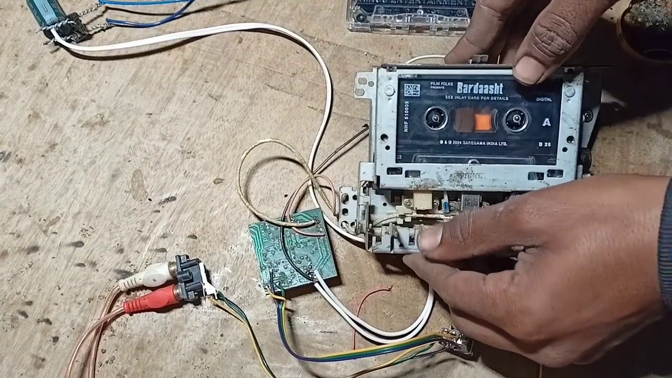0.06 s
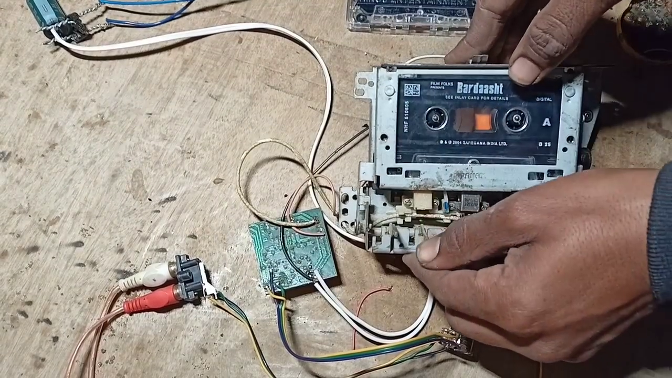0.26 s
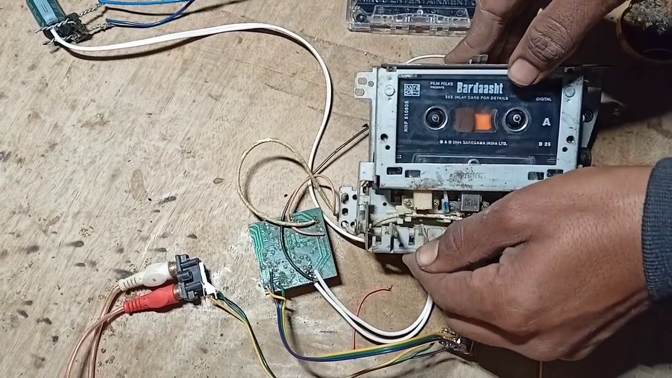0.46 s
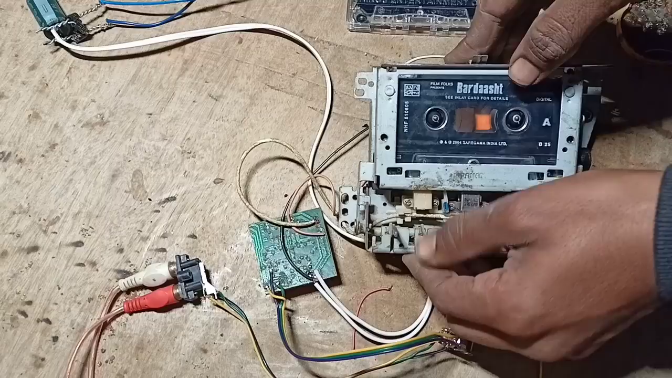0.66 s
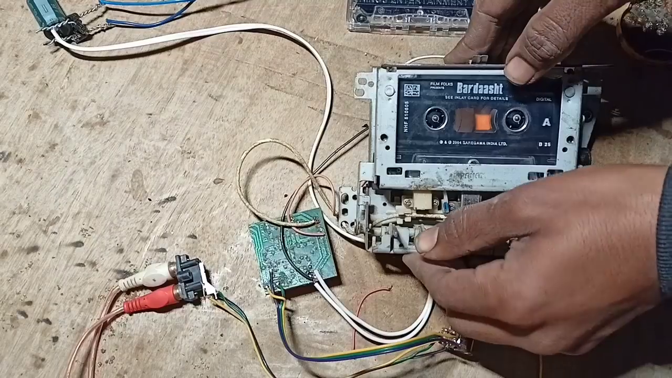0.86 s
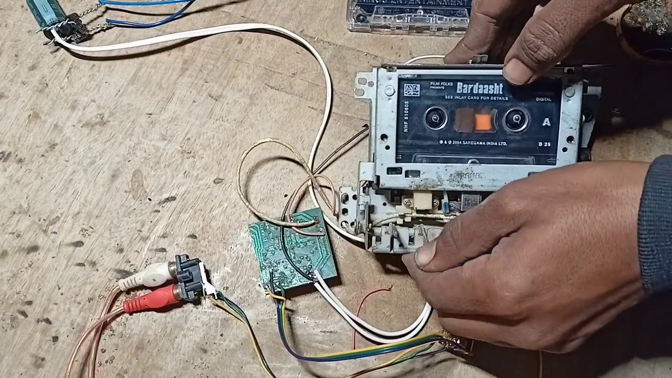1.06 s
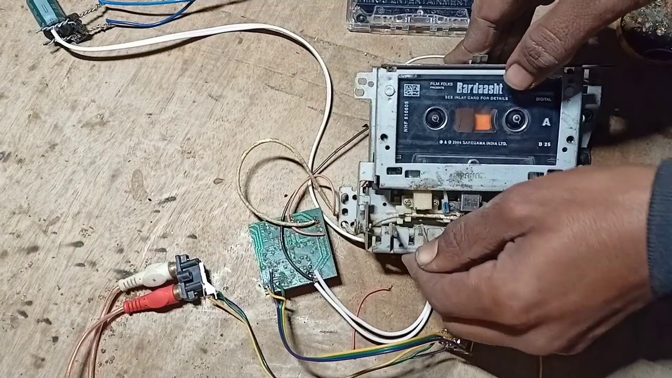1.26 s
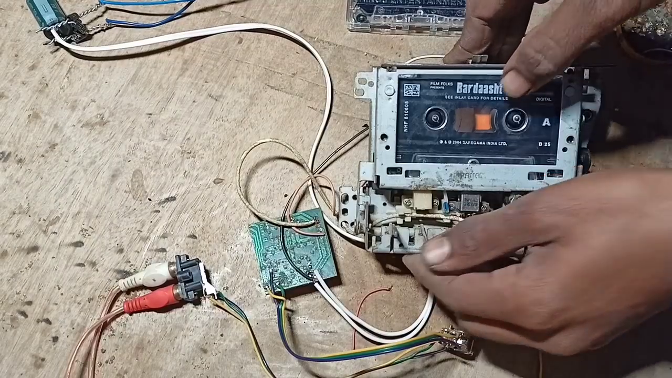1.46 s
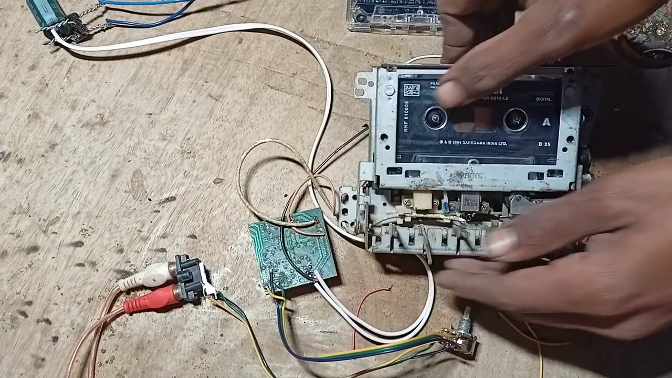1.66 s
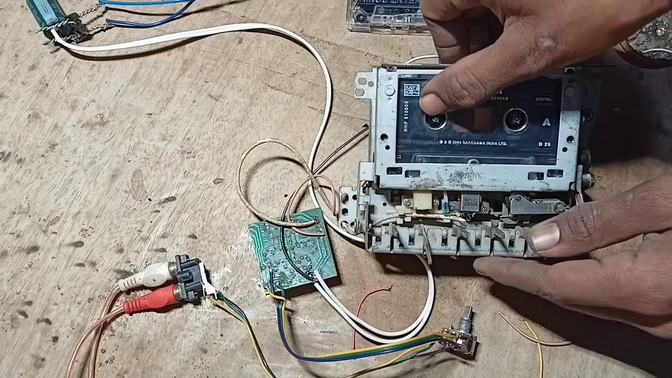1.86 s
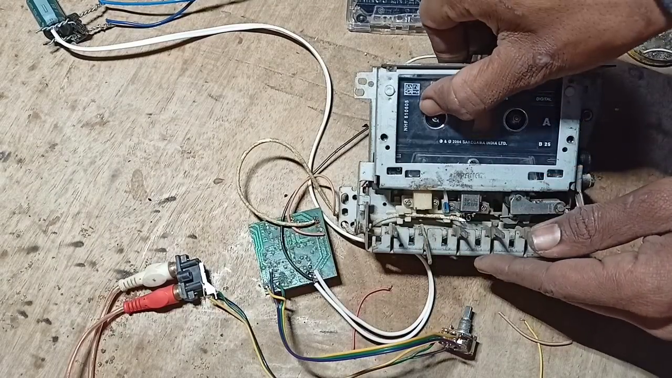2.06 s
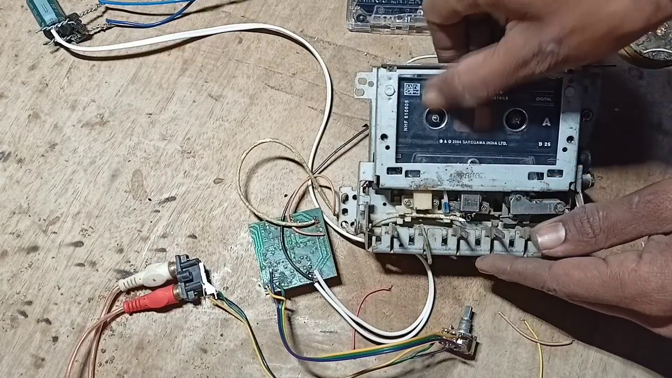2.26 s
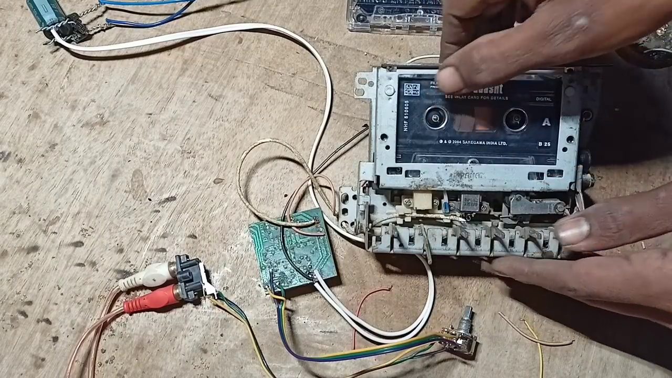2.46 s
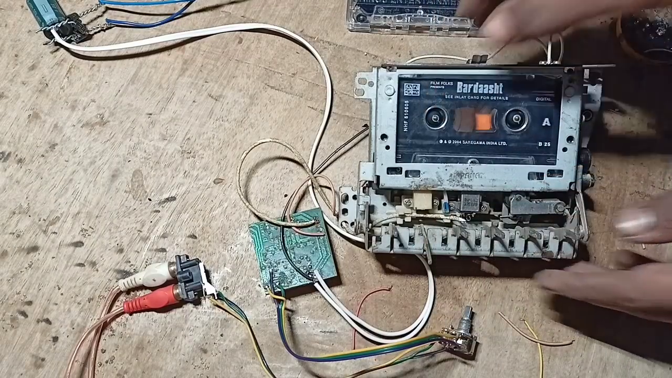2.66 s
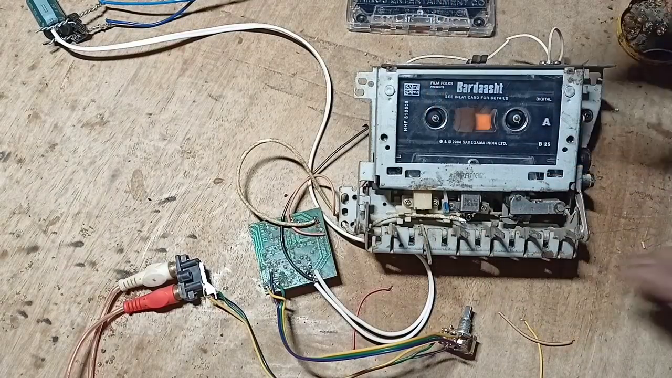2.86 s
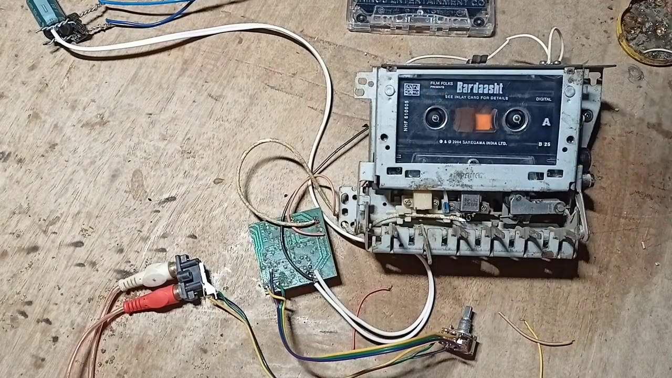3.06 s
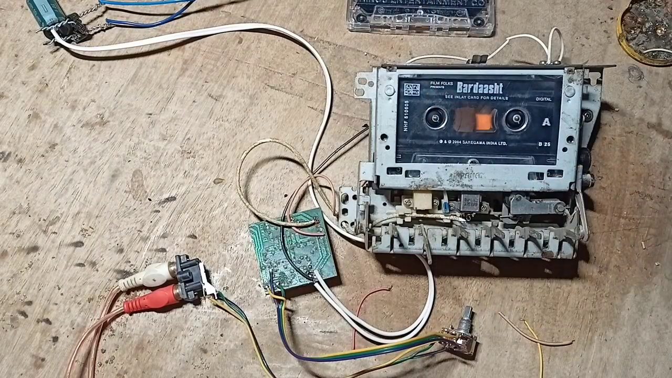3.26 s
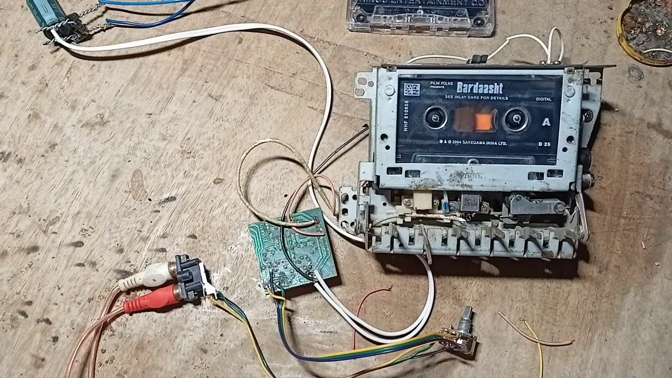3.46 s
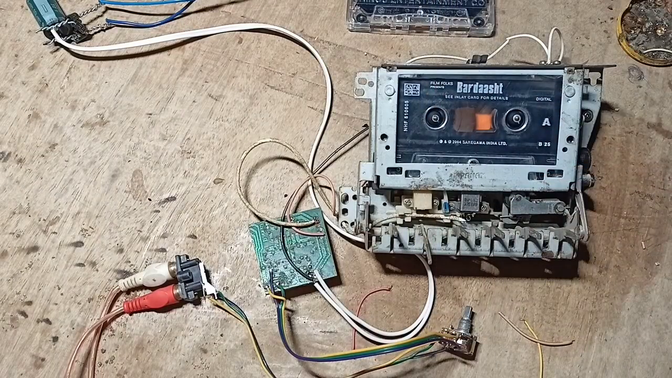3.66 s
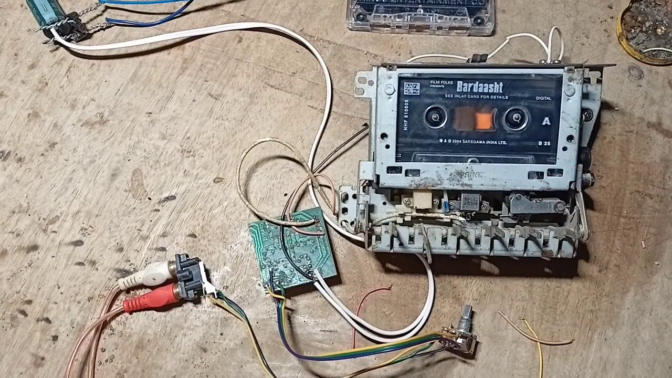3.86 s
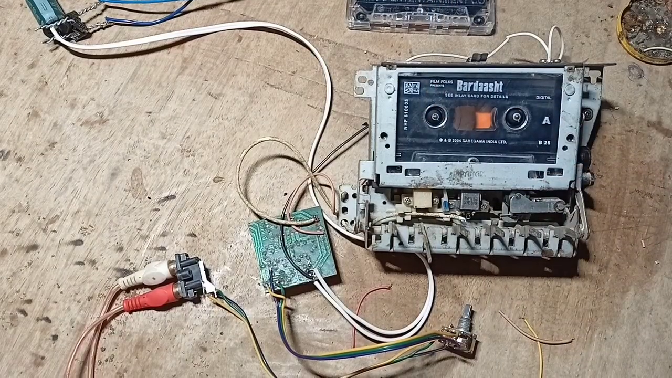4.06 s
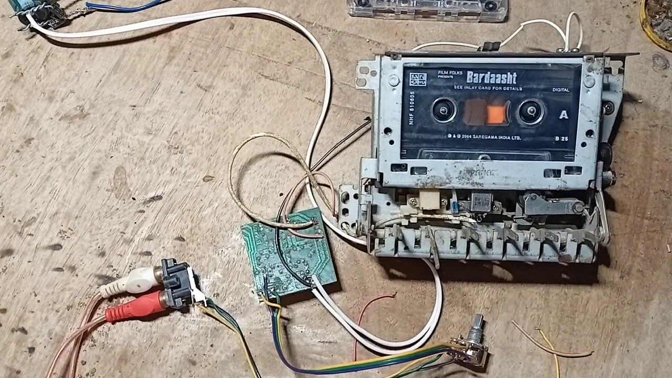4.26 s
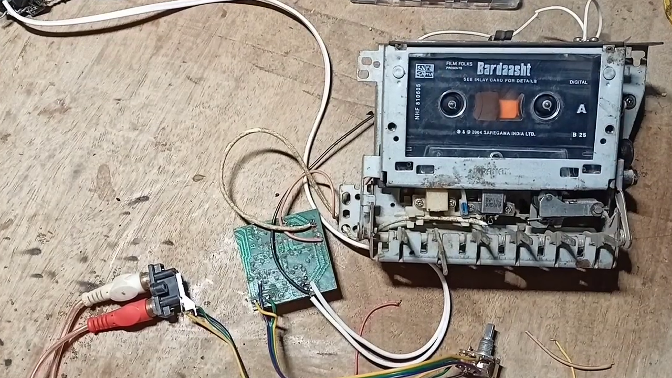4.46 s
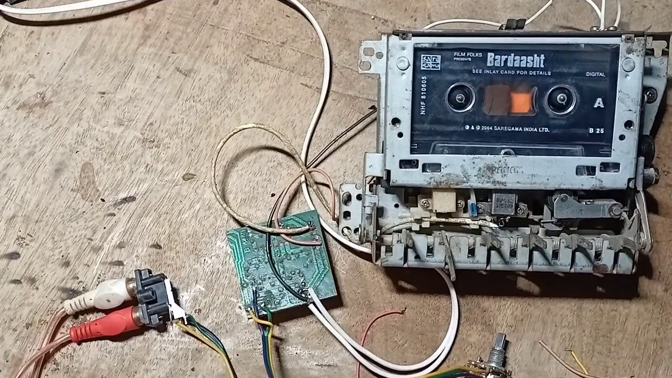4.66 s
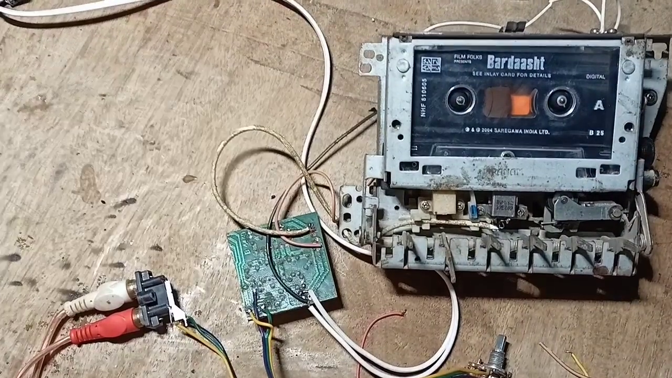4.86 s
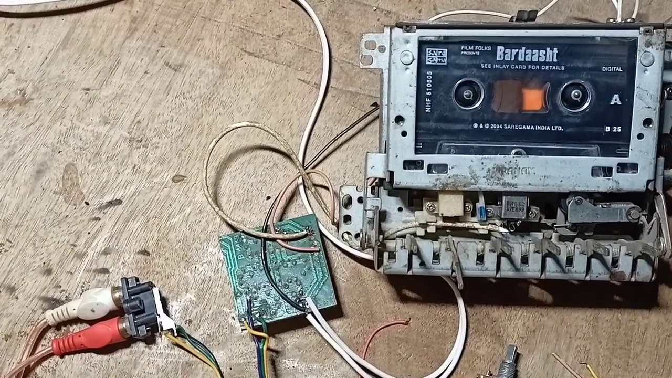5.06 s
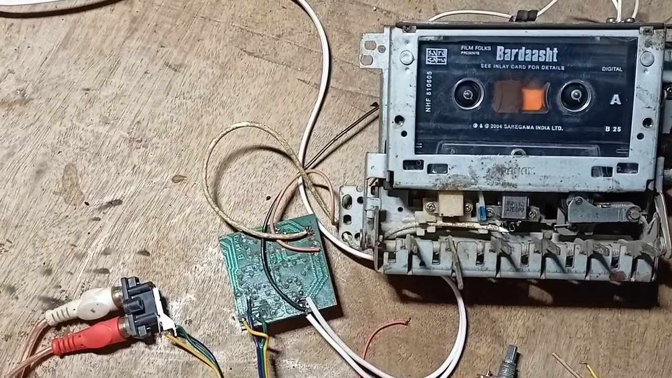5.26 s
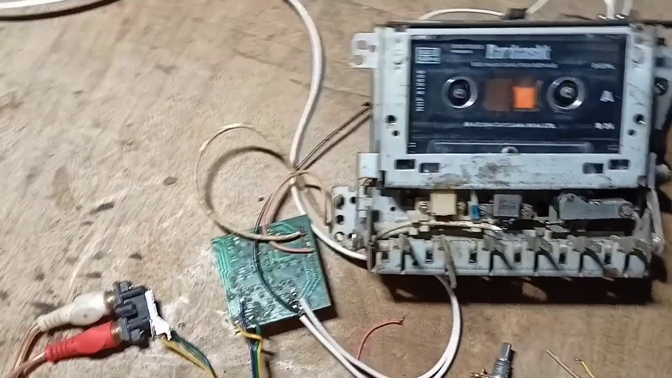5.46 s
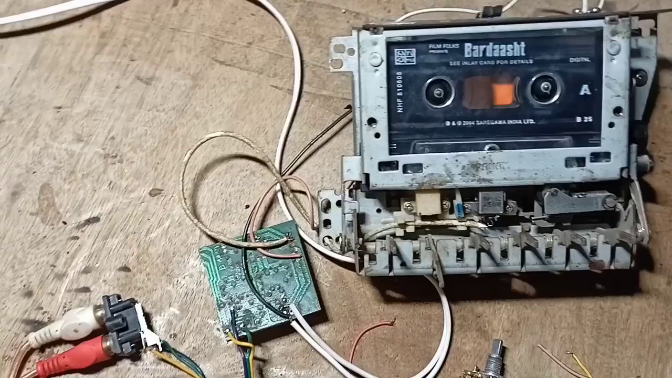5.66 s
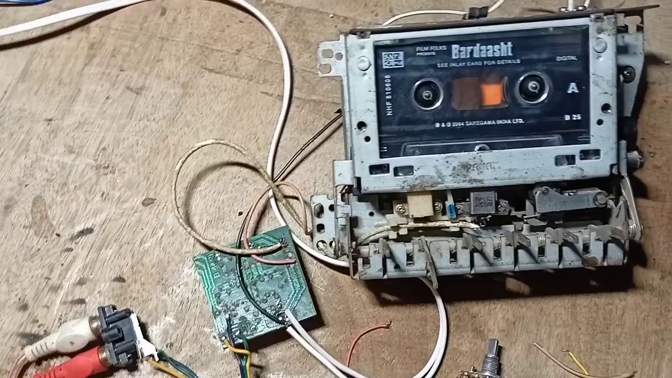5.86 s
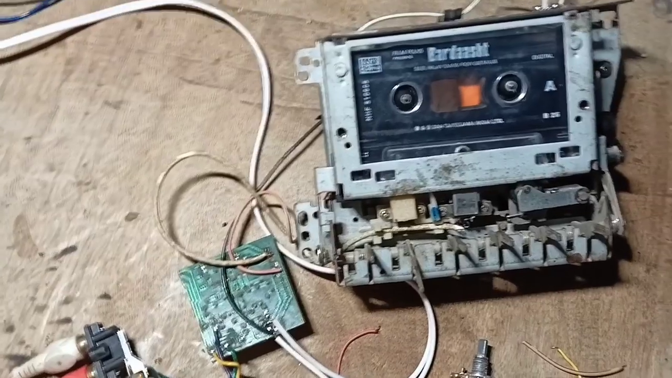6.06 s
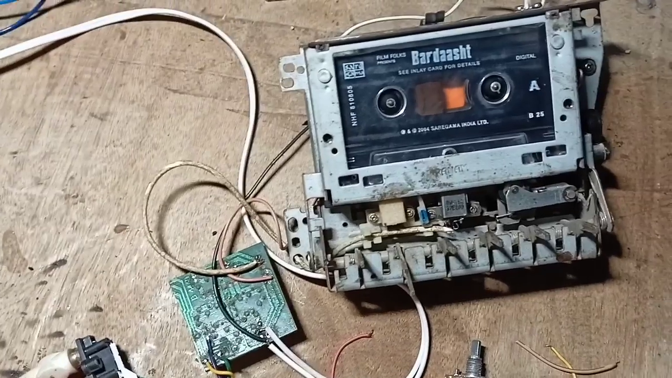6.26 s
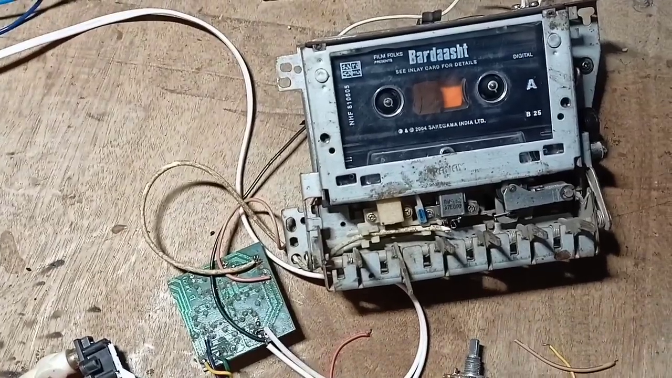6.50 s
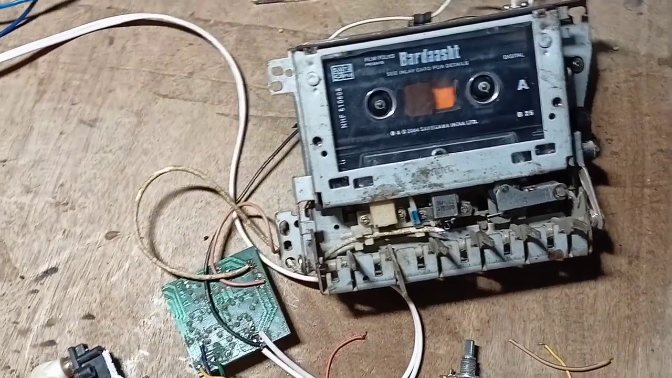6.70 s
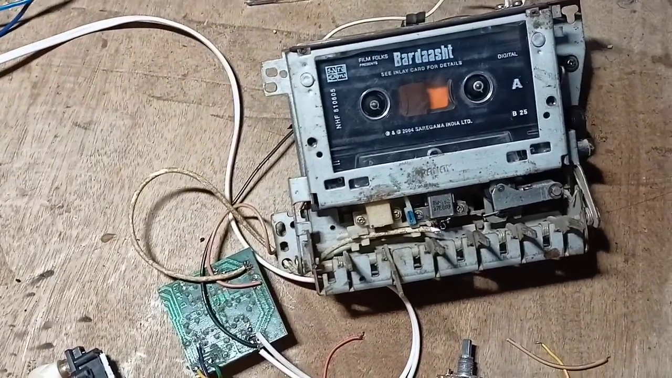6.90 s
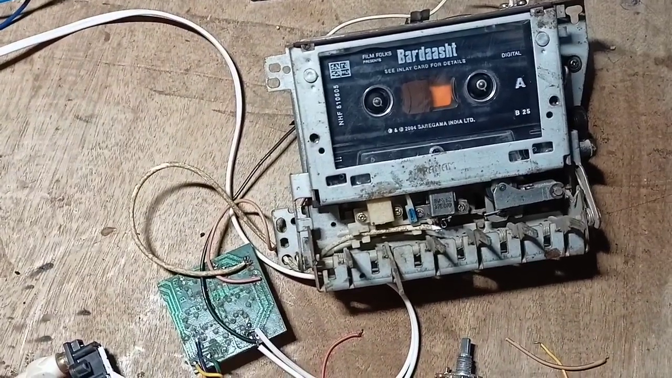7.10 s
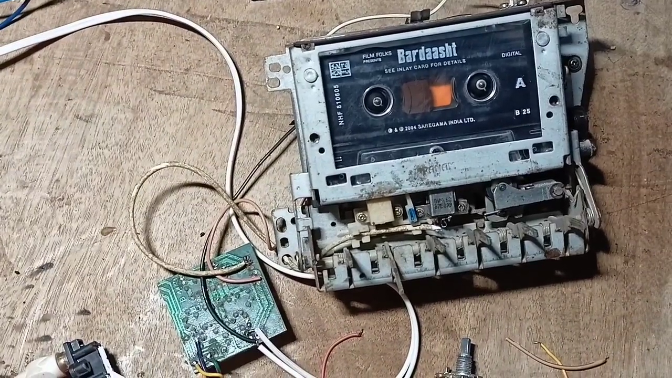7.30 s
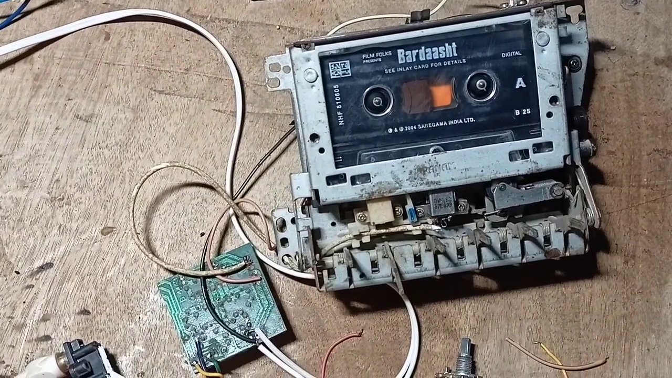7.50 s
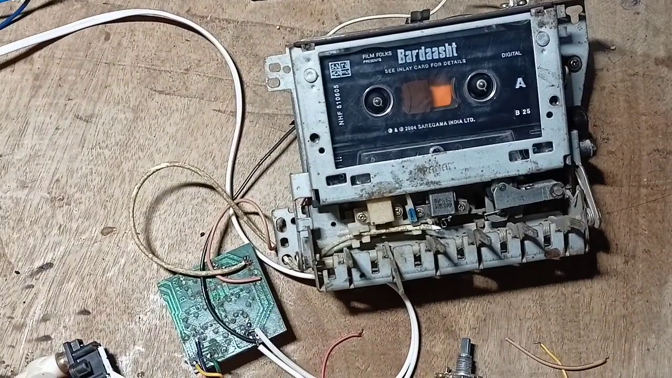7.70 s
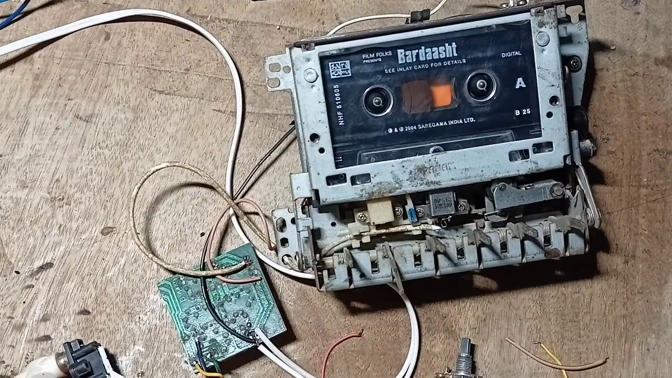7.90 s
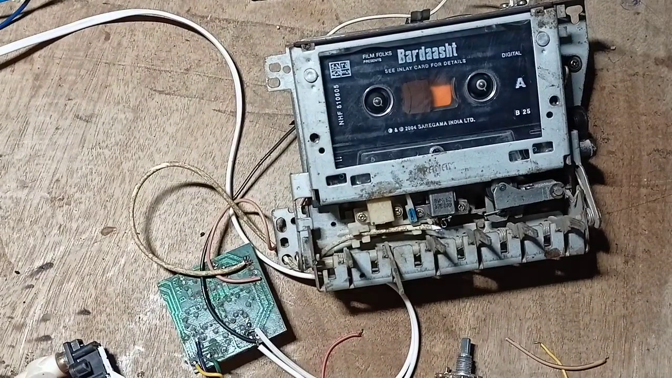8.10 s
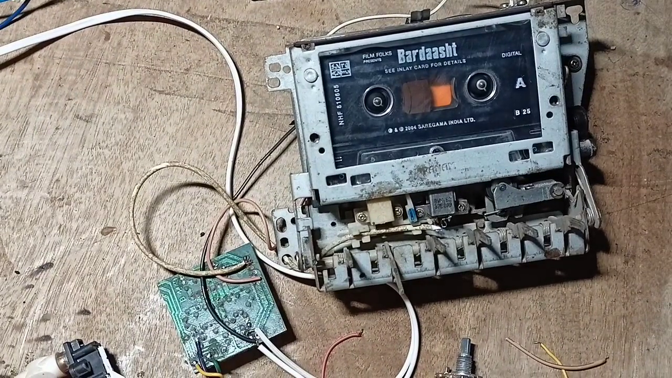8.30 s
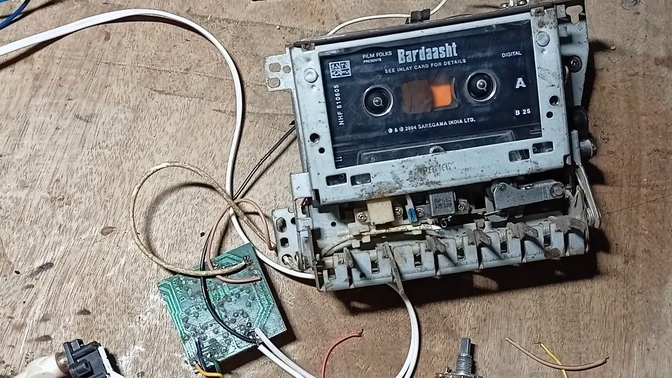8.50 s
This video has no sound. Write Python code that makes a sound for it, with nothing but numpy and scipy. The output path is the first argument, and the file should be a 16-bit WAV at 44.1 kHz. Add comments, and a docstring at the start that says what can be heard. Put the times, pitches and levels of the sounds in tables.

```python
"""Cassette mechanism winding on a bench

A bare cassette mechanism on a wooden bench is started, stopped and started again, then winds tape.
Rubbing and knocking gears and spool hubs drive noise through the resonances of the steel chassis.
The key's thumps are decaying bench modes; the motor is a throbbing tone in a band of noise.
Mains hum and the thin whine of a switching supply, both built from sines, run throughout."""
import sys
import numpy as np
from scipy import signal
from scipy.fft import rfft, irfft
from scipy.io import wavfile
from scipy.ndimage import uniform_filter1d

SR = 44100
rng = np.random.default_rng(int(sys.argv[2]) if len(sys.argv) > 2 else 0)


def dump_mix(stems):
    """Bounce the given channels to the path in sys.argv[1] as a 16-bit WAV at rate SR."""
    frames = np.atleast_2d(stems).T  # one column per channel
    limited = np.clip(frames, -1, 1)  # hard clip at full scale
    pcm = np.round(limited * 32767).astype(np.int16)
    wavfile.write(sys.argv[1], SR, pcm)


N = 376613
T = np.arange(N) / SR  # s

MAINS_HZ = 49.85
RUN_UP_S, RUN_DOWN_S = 0.013, 0.061  # motor run-up; the wheels coast to rest
# the winding key is down: start t/s, end t/s
RUNS = [(0.42, 0.915), (1.133, 9)]


def gain_of(db):
    """Decibels to a factor."""
    return 10 ** (np.asarray(db) / 20)


def evened(x):
    """Scales to rms 1."""
    return x / np.sqrt(np.mean(x ** 2) + 1e-20)


def curve(rows, order=1):
    """One column of a table, joined by straight lines, at every sample."""
    rows = np.array(rows)
    return np.interp(T, rows[:, 0], rows[:, order])


def between(start_s, end_s, ramp_s):
    """One from start to end with straight ramps inside, zero elsewhere."""
    return np.clip(np.minimum(T - start_s, end_s - T) / ramp_s, 0, 1)


def read(points, hz):
    """A spectrum in dB on a log-frequency axis."""
    f, value = np.transpose(points)
    return np.interp(np.log(hz + 1), np.log(f + 1), value)


def causal(db):
    """Minimum-phase impulse response of unit energy for a half spectrum in dB."""
    both_halves = np.r_[db, db[-2:0:-1]]
    log_gain = np.log(gain_of(np.maximum(both_halves, -100)))
    phase = -signal.hilbert(log_gain).imag
    taps = np.fft.ifft(np.exp(log_gain + 1j * phase)).real[:len(db)]
    return taps / np.linalg.norm(taps)


def hiss(points):
    """Steady noise of rms 1 with a given spectrum."""
    gain = gain_of(read(points, np.fft.rfftfreq(N, 1 / SR)))
    return evened(irfft(rfft(rng.standard_normal(N)) * gain, N))


def wander(top_hz):
    """Slow chance of rms 1: twelve sines of random phase over the decade below top_hz."""
    hz = np.geomspace(top_hz / 10, top_hz, 12)[:, None]
    coarse = T[::256]
    sines = np.sin(2 * np.pi * (hz * coarse + rng.random((12, 1))))
    return np.interp(T, coarse, evened(sines.sum(0)))


def resonate(x, hz, width_hz):
    """A single resonance of gain 1 at its peak."""
    return signal.lfilter(*signal.iirpeak(hz, hz / width_hz, fs=SR), x)


def engaged(ramp_s):
    """One while the winding key is down, zero while it is up, with a run-up and a coast to rest."""
    return sum(np.clip(np.minimum((T - a) / ramp_s, (b - T) / RUN_DOWN_S + .5), 0, 1) for a, b in RUNS)


def hum():
    """Transformer hum: steady partials of the mains, the odd ones a quarter turn from the even ones."""
    # hum partials: multiple of mains, relative rms level/dB
    partials = [(1, -51), (2, -56), (3, -47), (4, -49), (5, -62), (7, -70), (8, -70)]
    waves = sum(gain_of(db) * np.sqrt(2) * np.cos(2 * np.pi * (k * MAINS_HZ * T + k % 2 / 4))
                for k, db in partials)
    return gain_of(0.3) * waves


def whine():
    """Switching tones split by the mains ripple, each fading on its own, in a fuzz that throbs with the ripple."""
    # supply tones: carrier f/Hz, sideband number in steps of twice the mains, relative level/dB
    tones = [(15103, -3, -64), (15103, -2, -63), (15103, -1, -60), (15103, 0, -51), (15103, 1, -53),
             (15103, 2, -58), (15103, 3, -66), (15028, -3, -64), (15028, -2, -57), (15028, -1, -61),
             (15028, 0, -58), (15028, 1, -57), (15028, 3, -66), (15478, 0, -62)]
    # the whine wavers at the microphone: t/s, level/dB
    wavering = [(0, -48), (.5, -42), (.88, -48), (1.12, -42), (1.9, -43), (2.31, -51), (2.88, -37.5),
                (3.54, -41), (4.14, -46), (4.92, -39), (5.2, -47), (5.78, -39), (6.16, -45.5), (6.85, -41),
                (7.42, -49), (7.66, -38), (8.54, -44)]
    lines_db, fuzz_db = -2, -8  # shares of tones and fuzz
    lines = 0
    for hz, k, db in tones:
        fading = gain_of(db + 3.5 * wander(1.33))
        lines += fading * np.sin(2 * np.pi * ((hz + 2 * k * MAINS_HZ) * T + rng.random()))
    fuzz = hiss([(13500, -14), (14500, -3), (14900, 5), (15400, 7), (16000, 0)])
    fuzz *= 1 + 0.34 * np.cos(4 * np.pi * MAINS_HZ * T)
    return gain_of(curve(wavering)) * (gain_of(lines_db) * evened(lines) + gain_of(fuzz_db) * fuzz)


def motor():
    """The motor tone and its whir throb once per turn of the belt."""
    # whir spectrum: f/Hz, relative level/dB per Hz
    whir_colour = [(330, -7), (400, -3.5), (480, -10.5), (600, 4.5), (720, 2.5), (850, -7), (1000, -6.5),
                   (1200, -32)]
    motor_hz, belt_hz, belt_start = 301.5, 8.37, .144  # belt start in turns
    tone_idle_db, tone_held_db, tone_free_db = -76, -57.5, -51  # key up, key held, hand lifted
    let_go_s = 1.5
    whir_idle_db, whir_db = -65.5, -53  # key up, key down
    turns = motor_hz * T + 0.021 * wander(2.5)
    belt = belt_hz * T + belt_start
    tone = evened(np.sin(2 * np.pi * turns) + 0.65 * np.sin(2 * np.pi * (turns - belt)))
    whir = gain_of(1.43 * wander(40.)) * hiss(whir_colour) * (1 + 0.16 * np.cos(2 * np.pi * belt))
    on = engaged(RUN_UP_S) ** 3  # dies sooner than the gears
    loaded_db = np.interp(T, [let_go_s, let_go_s + RUN_UP_S], [tone_held_db, tone_free_db])
    loaded_db += -4.5 * between(1.84, 2.49, 0.14)  # a thumb on the shell damps the tone
    tone_db = tone_idle_db + on * (loaded_db - tone_idle_db) + 0.8 * wander(2.1)
    return gain_of(tone_db) * tone + gain_of(whir_idle_db + on * (whir_db - whir_idle_db)) * whir


def room():
    """Faint background hiss that rises with the key, unsteady low rumble and a faint tone."""
    # background spectrum: f/Hz, relative level/dB per Hz
    background_colour = [(180, -34), (300, -3), (471, -13.5), (553, -5.5), (629, -10.5), (2240, -21),
                         (6790, -18.5), (7850, -12.5), (12500, -22.5), (14000, -19)]
    # rumble spectrum: f/Hz, relative level/dB per Hz
    rumble_colour = [(30, -33), (55, -10), (80, -3.5), (130, -2.5), (250, -0.5), (330, -11), (450, -14.5),
                     (600, -60)]
    idle_db, running_db = -57, -51.5  # background, key up and key down
    dip_db = -4.5 * between(.94, 1.03, .02)  # dips briefly between the two runs
    background_db = idle_db + engaged(RUN_UP_S) * (running_db - idle_db) + dip_db
    background = gain_of(background_db) * hiss(background_colour)
    rumble = gain_of(-53.5 + 4.1 * wander(14.0)) * hiss(rumble_colour)
    faint = gain_of(-65 + 2.3 * wander(4.)) * np.sin(2 * np.pi * (556 * T + 0.12 * wander(8.)))
    return background + rumble + faint


def scuffs(per_s, spread_db, length_s):
    """Envelope of rms 1 of brief contacts at random moments, uneven in strength."""
    size = gain_of(spread_db * np.minimum(rng.exponential(1, N), 4)) * (rng.random(N) < per_s / SR)
    t = T[:3000] / length_s
    return evened(signal.oaconvolve(size, t * np.exp(-t))[:N])


def idler():
    """Envelope of one tick for each turn of the idler, uneven in strength and slightly in time."""
    # an idler wheel with one high tooth slows under the thumb: t/s, rate/turns per s
    speed = [(0, 46.3), (2, 46.3), (2.3, 44.5), (2.6, 47.2), (6.9, 47.2), (7.3, 47.7), (8.54, 47.6)]
    start_turns = .145
    turns = np.floor(np.cumsum(curve(speed)) / SR + start_turns + .06 * wander(3.0))
    ticks = np.r_[0, np.diff(turns) > 0] * gain_of(3.7 * rng.standard_normal(N))
    t = T[:1500] / 0.0026
    return evened(signal.oaconvolve(ticks, t * np.exp(-t))[:N])


def contacts():
    """Strength of rubbing and knocking below and above the middle of the chassis range."""
    # winding gears: t/s, level/dB midway between low and high part, brightness (high over low)/dB
    wind = [(.42, -44, -10), (.48, -38, -7), (.88, -39, -2), (1.14, -42, -1), (1.3, -39.5, -5),
            (1.96, -36, -5.5), (2.15, -38, -4), (3.42, -35.5, -0.5), (5.13, -36.5, -2.5), (5.86, -35, -2),
            (7.18, -37, -1.5), (8.54, -35.5, -2)]
    # key clicks and hub rattles: mid-rise t/s, level of the high part/dB, brightness/dB, length/ms
    clicks = [(.0674, -42.5, -6.5, 6), (.1128, -45, 2, 7), (.1295, -47.5, -9.5, 11), (.178, -28, 12, 11.4),
              (0.24, -34.5, 5, 13), (.4005, -40, 14, 6.4), (.4197, -29.5, -2.5, 2.8), (.456, -44, -10, 17),
              (.5573, -43, 6, 12), (.639, -36, 12, 8), (.66, -37.5, 1, 10), (.739, -39, -14, 12.5),
              (.7711, -33, 7, 4.1), (.788, -26, 20, 8), (.8501, -25, 15, 4.9), (.8678, -30.5, 23, 9),
              (.907, -47, 13, 13), (1.048, -33.5, 2, 6.4), (1.0741, -45, -4, 9.1), (1.1315, -27.5, 6, 5),
              (1.142, -45, -15, 13), (1.1946, -27, 12, 4.4), (1.212, -38, 8, 12), (1.331, -26.5, 6, 5.5),
              (1.339, -26, -10, 10.5), (1.3759, -27, -3, 6), (1.416, -46, -17.5, 18), (1.491, -38, -16, 7),
              (1.7935, -31.5, 3, 6), (1.858, -32, 12, 7), (2.075, -39, -6, 6), (2.2284, -35, 11, 7),
              (2.2754, -26, 27, 4), (2.2968, -33, 16, 5), (2.5472, -29.5, 15, 5.6), (2.6106, -31, 12, 6),
              (3.16, -38, 0, 11), (3.233, -33, 18, 9), (3.448, -25, 9, 5.9), (3.4997, -28, 14, 14),
              (3.525, -22.5, 2, 9.3), (3.818, -31.5, 7, 5.3), (3.929, -32.5, 3, 12), (3.939, -28, 6, 8),
              (4.1947, -24.5, 1.5, 10.4), (4.2196, -22.5, 10, 7.7), (4.2694, -32, 22, 8),
              (4.279, -29, 18, 8.4), (4.288, -23, 18, 6), (4.3293, -21.5, 9, 14), (4.3506, -22, 8, 10),
              (4.4038, -26, 4, 13), (4.417, -25, 11, 10), (4.4283, -20, 1, 6.2), (4.692, -28.5, 5, 9),
              (4.7545, -32, 11, 16), (5.3523, -28.5, 10, 5.9), (5.472, -28.5, 6, 3.6),
              (5.619, -31.5, 0, 10), (5.67, -33, 1, 5), (5.6916, -29, 1, 4.4), (5.8683, -22, 18, 3.7),
              (5.888, -36, 2, 6), (5.902, -28, 2, 3.4), (5.934, -24, 8, 9.7), (5.944, -23.5, 9, 9.2),
              (5.962, -17.5, 3, 5.6), (6.021, -23, 9, 6), (6.214, -28.5, 3, 6), (6.602, -27, 22, 4.3),
              (6.654, -32, 12, 13), (6.7916, -36.5, 4, 15), (6.84, -31.5, 13, 11), (6.975, -29.5, 15, 5.7),
              (7.045, -35, 15, 5.4), (7.158, -35, 13, 6.9), (7.35, -31, 3, 10), (7.4747, -34, 4, 18),
              (7.487, -27.5, 8, 14), (7.504, -19, 5, 7), (7.558, -28.5, 10, 15), (7.614, -24, 3, 13),
              (7.625, -32, 12, 10), (7.632, -26, 14, 8.3), (7.674, -27.5, 9, 12), (7.688, -29, 3, 11),
              (7.795, -34, 6, 9.6), (7.907, -28.5, 4, 6.5), (7.926, -30.5, -7.5, 7.9), (8.022, -36, 2, 6),
              (8.0535, -34, -1, 7), (8.119, -37, -8, 7), (8.2418, -24.5, 11, 7.1), (8.4174, -17, 9, 12),
              (8.429, -28.5, -1, 7.1)]
    rise, hold = 0.19, 0.49  # shares of the length: half the rise, then the stay at full strength
    shared = scuffs(per_s=50., spread_db=2.0, length_s=0.0013) + idler()
    low_scuffs = scuffs(per_s=34.0, spread_db=0.5, length_s=0.00068)
    high_scuffs = scuffs(per_s=66.0, spread_db=1.0, length_s=0.00068)
    loud = engaged(0.016) * gain_of(curve(wind))
    bright = gain_of(curve(wind, order=2) / 2)
    low = loud / bright * evened(2.3 + 0.38 * shared + 0.57 * low_scuffs)
    high = loud * bright * evened(2.15 + shared + 0.32 * high_scuffs)
    for s, db, bright_db, length_ms in clicks:
        at = slice(round(s * SR) - 600, round(s * SR) + 4000)
        t, length = T[at] - s, length_ms / 1000
        fall = .5 ** (np.maximum(t - hold * length, 0) / ((1 - hold) * length))
        shape = gain_of(db) * np.clip(.5 + t / (2 * rise * length), 0, 1) * fall
        low[at] += gain_of(-bright_db) * shape
        high[at] += shape
    return low, high


def drifting(x, patchy_db):
    """The colour of the noise drifts at random, in patches of time and frequency."""
    z = signal.stft(x, nperseg=256)[2]
    patches = rng.standard_normal(z.shape[::-1]).T
    patches = uniform_filter1d(patches, size=5, axis=0)  # across frequency
    patches = evened(uniform_filter1d(patches, size=12, axis=1))  # across time
    return evened(signal.istft(z * gain_of(patchy_db * patches), nperseg=256)[1][:N])


def mechanism():
    """The contacts shake the steel chassis, which colours them with its resonances."""
    # broad colour of the chassis: f/Hz, relative level/dB per Hz
    body = [(590, -56), (1000, -20.5), (1760, -8), (2060, -13), (2510, -13), (3160, -13.5), (5740, -9),
            (6510, -5.5), (8200, -4.5), (12300, -15), (15600, -2.5)]
    # chassis resonances: f/Hz, width/Hz, level over the broad colour/dB
    modes = [(1524, 67, 6.5), (1790, 170, 5), (2520, 98, 7), (2791, 275, 11), (3625, 140, 7), (4830, 84, 6),
             (5130, 300, 5), (5660, 216, 7), (6020, 220, 5.5), (6960, 47, 7), (7375, 110, 7),
             (7900, 180, 3.5), (8185, 310, 9), (8714, 280, 7.5), (11330, 260, 9), (13440, 400, 4.5),
             (15000, 770, 4.5)]
    # the chassis is deaf here: f/Hz, width/Hz, level over the broad colour/dB
    gaps = [(2240, 135, -3), (3260, 160, -3.5), (6700, 130, -3.5)]
    # a spring rings along: t/s, level of its drive/dB
    spring = [(0, 5), (2, 1), (4, 5.5), (8, 11.5), (8.54, 18.5)]
    # a thumb on the shell brings out more: f/Hz, width/Hz, start t/s, end t/s, level of the drive/dB
    pressed = [(3720, 130, 2.13, 2.27, 12), (3880, 150, 2.2, 2.37, 9), (7250, 500, 1.9, 2.36, 4)]
    low, high = contacts()
    unevenness = evened(uniform_filter1d(rng.standard_normal(N), size=40))
    chatter = gain_of(1.87 * unevenness)  # teeth meet unevenly
    drive = drifting(rng.standard_normal(N) * chatter, patchy_db=2.0)
    under = signal.filtfilt(*signal.butter(2, 4500, fs=SR), drive)
    shaking = low * under + high * (drive - under)
    hz = np.fft.rfftfreq(8192, 1 / SR)
    colour_db = read(body, hz) + sum(db / (1 + (2 * (hz - f) / w) ** 2) for f, w, db in modes + gaps)
    out = signal.oaconvolve(shaking, causal(colour_db))[:N]
    rings = resonate(gain_of(curve(spring)) * out, 4087, width_hz=78)
    for f, w, a, b, db in pressed:
        rings += resonate(gain_of(db) * between(a, b, 0.11) * out, f, w)
    return out + rings


def thumps():
    """A push of about two milliseconds sets the whole bench top swinging and its boards knocking."""
    # blows on the bench: t/s, weight on the whole top (modes under 200 Hz)/dB, knock on the boards/dB
    blows = [(.067, -56, -41), (.179, -60, -37), (0.245, -60, -41), (0.4213, -4, -26), (.446, -40, -35),
             (0.476, -45, -41), (0.791, -37, -28), (0.849, -34, -36), (1.1364, -2.5, -33), (1.16, -40, -35),
             (1.19, -45, -42), (1.219, -34, -26), (1.243, -29, -43), (1.336, -37, -38.5), (2.469, -41, -43),
             (8.046, -39, -33)]
    # bench modes: f/Hz, relative level/dB, t60/s, direction and size of the first swing (factor)
    modes = [(81.4, -6, .2, -1.1), (132.5, 2, 0.074, 0.97), (256, -1.5, 0.079, 0.92),
             (386, -3, 0.16, -0.48), (554, -6, 0.084, 1), (768, 1.5, 0.034, -0.79), (940, -1, 0.045, 0.93),
             (452, -3.5, 0.051, 0.93)]
    t, out = T[:16000], np.zeros(N)
    push = (t / .0005) * np.exp(-t / 0.00032)
    mic = signal.butter(2, 60., "high", fs=SR, output="sos")  # a small microphone loses the deep bass
    for s, weight_db, knock_db in blows:
        ring = 0
        for hz, db, t60, way in modes:
            blow_db = weight_db if hz < 200 else knock_db
            ring += way * gain_of(db + blow_db - 60 * t / t60) * np.sin(2 * np.pi * hz * t)
        ring = signal.fftconvolve(ring, push / push.sum())[:len(t)]
        out[round(s * SR):][:len(t)] += signal.sosfilt(mic, ring)
    return out


def fizz():
    """Tiny contacts of small springs and levers, heard only in the high treble."""
    settled_db, key_db, settle_s = -56.5, 6.5, .8  # stronger just after the key goes down
    band = hiss([(8500, -30), (9800, -2), (11400, 1), (13000, -5), (14300, -30)])
    since = np.min([np.where(T < a, np.inf, T - a) for a, b in RUNS], axis=0)  # s since key down
    level = engaged(.02) * gain_of(settled_db + key_db * np.exp(-since / settle_s))
    return level * band * evened(.3 + scuffs(per_s=64.0, spread_db=5.0, length_s=0.0011))


def drones():
    """A low buzz, partials 2 to 5 of 40 Hz, that swells and fades with a flutter."""
    # short low drones: start t/s, end t/s, level before the partials' own gains/dB
    spells = [(5.6, 5.87, -54), (6.02, 6.446, -45.5)]
    partials_db = [-1.0, 1.0, -4.0, 2.0]
    tone = sum(gain_of(db) * np.sin(2 * np.pi * k * 40.0 * T) for k, db in enumerate(partials_db, 2))
    swell = sum(gain_of(db) * between(a, b, 0.13) for a, b, db in spells)
    return swell * gain_of(1.6 * wander(15.)) * tone


def scene():
    """All sources at one microphone."""
    steady = hum() + whine() + motor() + room()
    return (steady + mechanism() + thumps() + fizz() + drones())[None]


def record(dry):
    """The band limit: a steep low-pass at 15520 Hz."""
    low_pass = signal.firwin(801, 15520, window=("kaiser", 8), fs=SR)
    return signal.oaconvolve(dry, low_pass[None], "same")


dry = scene()
out = record(dry)
dump_mix(out)
```